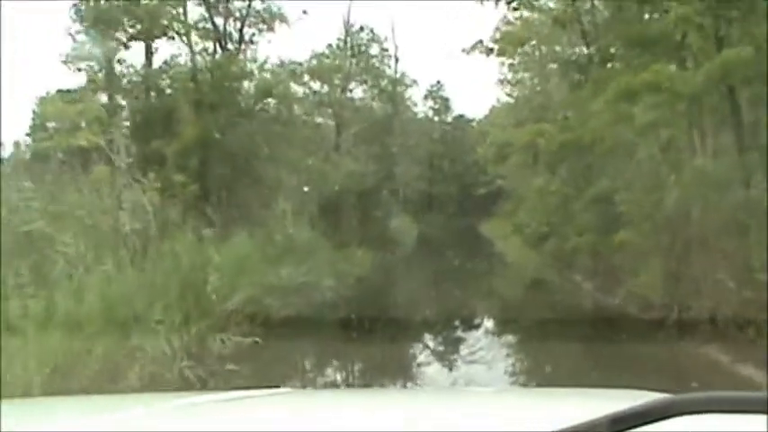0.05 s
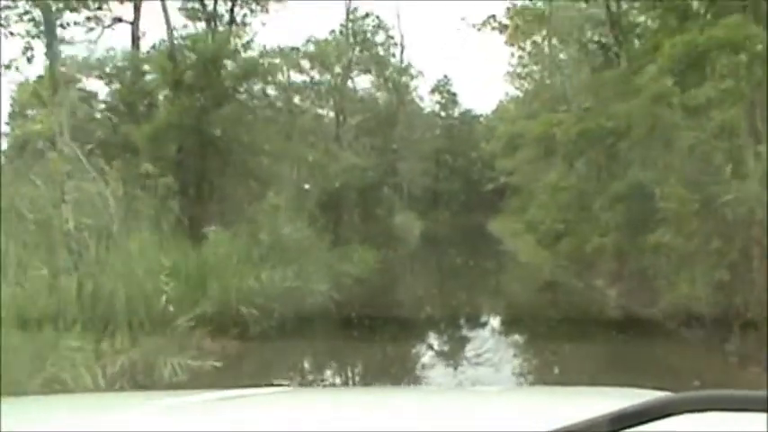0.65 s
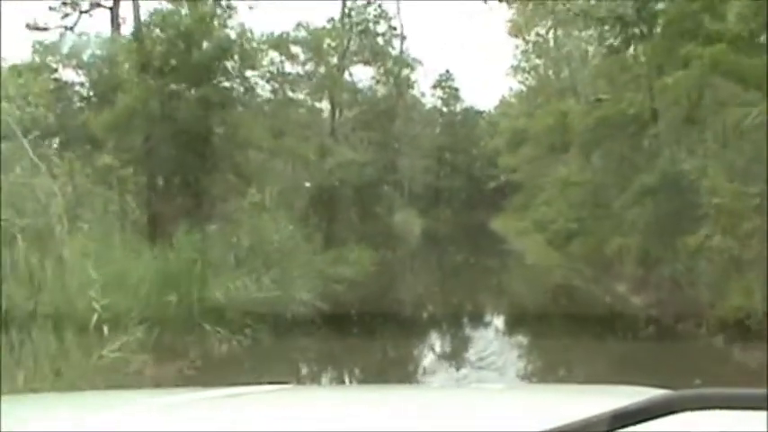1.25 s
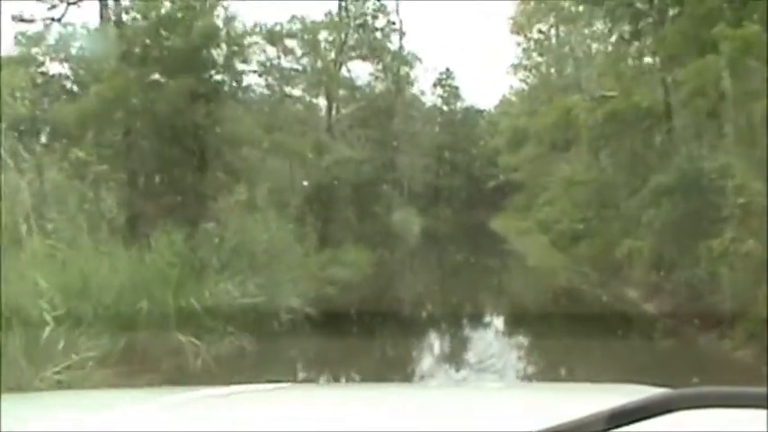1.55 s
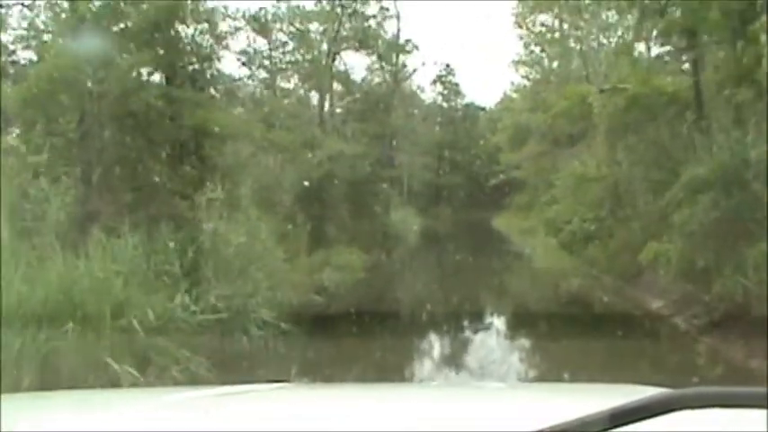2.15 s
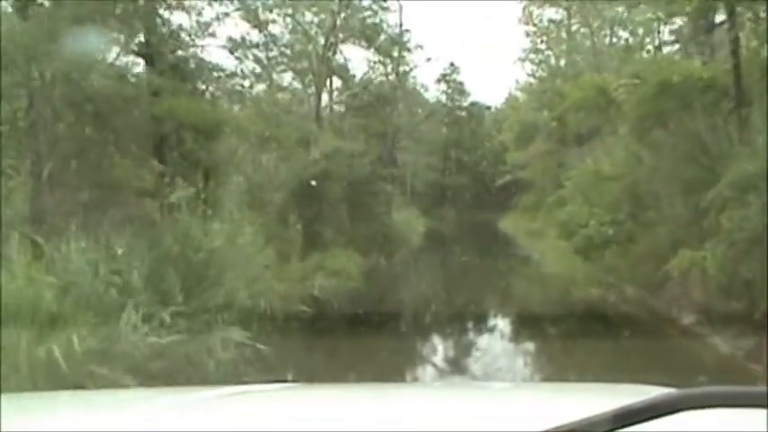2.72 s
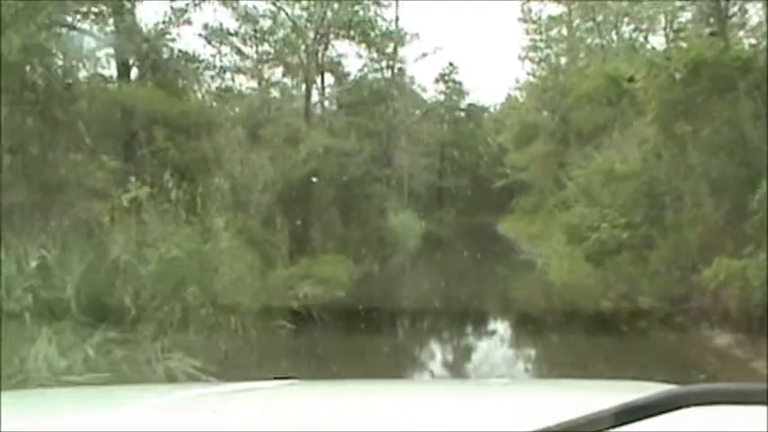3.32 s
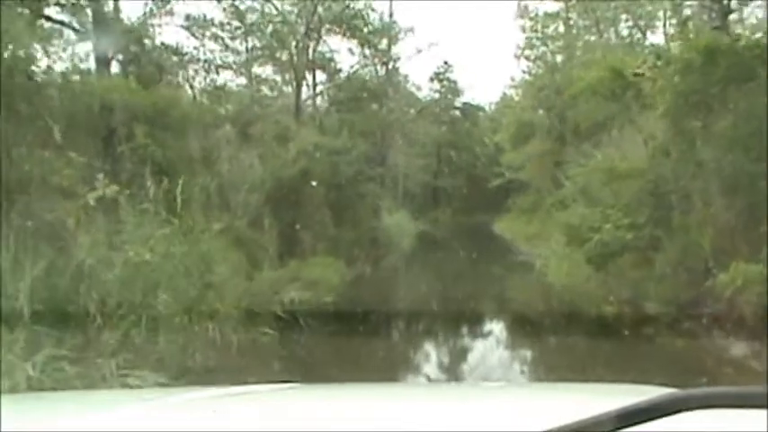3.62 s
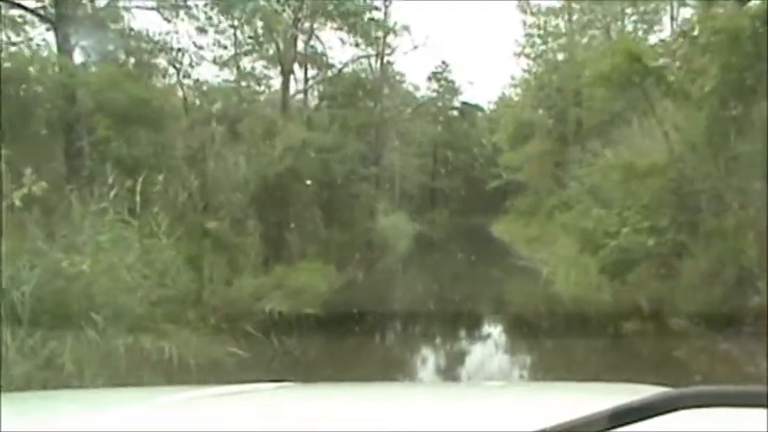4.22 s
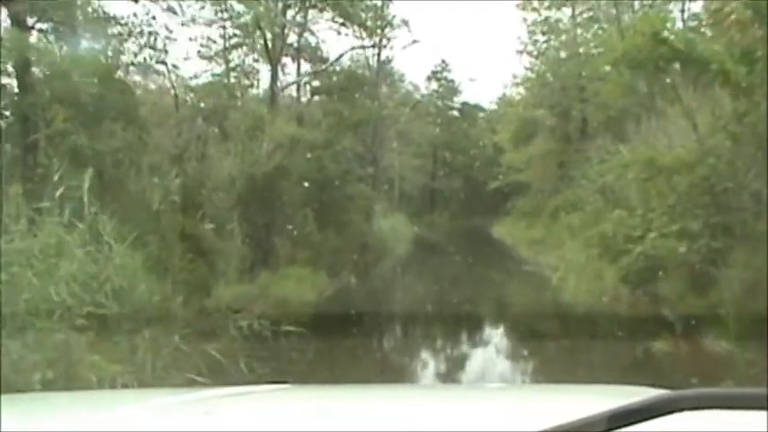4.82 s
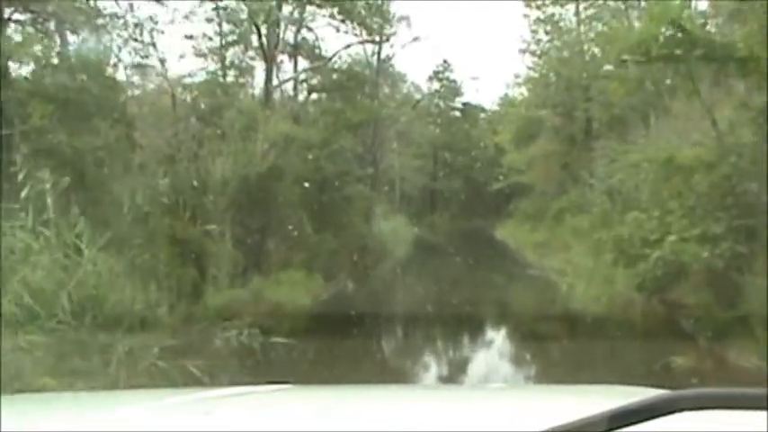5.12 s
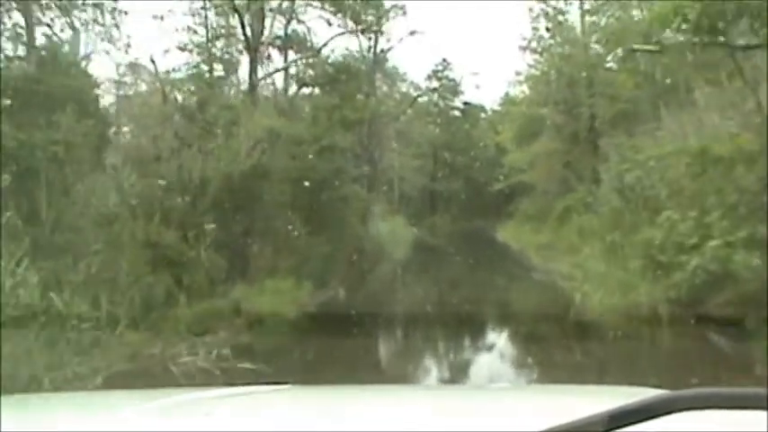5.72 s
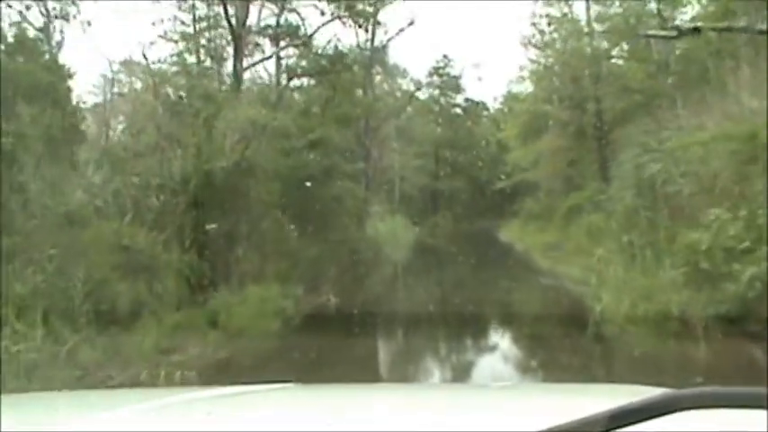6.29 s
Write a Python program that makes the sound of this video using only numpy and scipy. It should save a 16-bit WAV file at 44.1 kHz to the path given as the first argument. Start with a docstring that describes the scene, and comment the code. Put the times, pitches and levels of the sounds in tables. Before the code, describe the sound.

A deep, throbbing engine rumble fills the cab of a vehicle driving slowly through floodwater, with the microphone inside. The engine speed barely changes, and the exhaust bubbles under water. A softer rush of water and fine spray builds about a second in, with gurgles and slaps beneath the floor. The body knocks and loose trim clicks several times midway, over a rough panel buzz, and a few brief splashes follow near the end.

```python
"""A flooded trail, heard from the cab of an off-road vehicle wading at a steady crawl.
The six-cylinder engine drones; its exhaust burbles under water and makes the cab boom.
The bow wave washes along the body, and water slaps, gurgles and splashes around the floor pan.
The wet fan belt hisses, a panel buzzes, loose trim clicks and bumps jolt the body."""
import sys
import numpy as np
from scipy import signal
from scipy.fft import rfft, irfft
from scipy.io import wavfile
from scipy.ndimage import uniform_filter1d, minimum_filter1d

SR = 44100
rng = np.random.default_rng(int(sys.argv[2]) if len(sys.argv) > 2 else 0)


def transcribe(u):
    """Save the signal u as a 16-bit wav file named by the first command-line argument.

    u: samples, shape (n,) or (channels, n), limited to [-1, 1]; the rate is SR.
    q: integer samples, one column per channel.
    """
    v = np.clip(np.atleast_2d(u).T, -1, 1)
    q = np.round(v * 32767).astype(np.int16)
    wavfile.write(sys.argv[1], SR, q)


N = 280035
TIME = np.arange(N) / SR
BINS = np.maximum(np.arange(N // 2 + 1) * SR / N, 1)   # Hz


def from_db(db):
    """Decibels to gain."""
    return 10 ** (np.asarray(db) / 20)


def rms_one(x):
    """Scale to unit power."""
    return x / np.sqrt(np.mean(x ** 2) + 1e-20)


def at_level(pair, db):
    """Normalise the middle of a stereo pair, then ride its fader."""
    return pair / np.std(pair.mean(axis=0)) * from_db(db)


def in_time(rows):
    """A (time, value) curve, sample by sample."""
    return np.interp(TIME, *np.transpose(rows))


def in_frequency(rows):
    """Each column of a spectrum, bin by bin."""
    hz, *columns = np.transpose(rows)
    return [np.interp(np.log(BINS), np.log(hz), c) for c in columns]


def swell(s, length_s):
    """A smooth bump of height 1 around a moment."""
    return np.exp(-2 * ((TIME - s) / length_s) ** 2)


def since(s):
    """The samples of the second after a moment, and their age."""
    part = slice(int(s * SR), int(s * SR) + SR)
    return part, TIME[part] - TIME[part][0]


def drift(rate):
    """Random modulation of spread 1 that changes about `rate` times a second."""
    return rms_one(irfft(rfft(rng.standard_normal(N)) / (1 + (BINS / rate) ** 2), N))


def wavering_tone(hz, width_hz):
    """A tone of unit power whose strength and phase wander."""
    phase = 2 * np.pi * np.cumsum(hz * np.ones(N)) / SR
    return rms_one(drift(width_hz) * np.cos(phase) + drift(width_hz) * np.sin(phase))


def resonance(hz, width_hz):
    """Gain of one damped mode, 1 on top."""
    return abs(1 / (1 + 1j * (BINS ** 2 - hz ** 2) / (BINS * width_hz)))


def mode_bank(modes, widen=1):
    """Gain of steep-sided resonances whose powers add."""
    return np.sqrt(sum(from_db(2 * db) * resonance(hz, width * widen) ** 4 for hz, width, db in modes))


def colour(spectrum):
    """An EQ curve that falls away steeply beyond its ends."""
    skirts = 1 / (1 + (spectrum[0][0] / BINS / 2) ** 4) / (1 + (BINS / spectrum[-1][0] / 2) ** 4)
    return from_db(in_frequency(spectrum)[0]) * skirts


def stereo(direct, diffuse=np.zeros(N), eq=1):
    """Two close microphones: direct sound reaches both phase-shifted, reflections differ at each."""
    # stereo image: (frequency [Hz], likeness [0-1], left lead [rad], left minus right [dB])
    image = [(20, .997, -.4, .2), (55, .997, -.88, 0), (120, .985, -1.3, -1.5), (220, .88, -1.35, -2),
             (380, .93, -1.3, .5), (660, .64, -1.1, 3.2), (1000, .58, -.68, .3), (2000, .58, -.42, -.3),
             (4000, .77, 0, 1.1), (7000, .72, .15, 1.7), (13000, .5, 0, 1.1)]
    alike, lead, balance_db = in_frequency(image)
    sides = np.array([[1], [-1]])
    pair = np.sqrt(1 + alike) * rfft(direct) + sides * np.sqrt(1 - alike) * rfft(diffuse)
    placement = np.exp(.5j * sides * lead) * from_db(sides * balance_db / 2)
    return irfft(pair * eq * placement / np.sqrt(2), N)


def bubbly_noise(per_s, band_hz, cycles, spread_db, bubbles_db):
    """Direct and diffuse water noise; in the direct part, random bubbles each ring a few cycles."""
    noise, pitches = rng.standard_normal((2, N)), 16
    strength = from_db(spread_db * np.minimum(rng.exponential(1, N), 4)) * rng.choice([-1, 1], N)
    bursts = strength * (rng.random(N) < per_s / SR)
    pitch_index = rng.integers(0, pitches, N)
    rings = np.zeros(N)
    for k, hz in enumerate(np.geomspace(*band_hz, pitches)):
        decay, step = from_db(-60 * hz / (cycles * SR)), 2 * np.pi * hz / SR
        resonator = [1 - decay, 0, decay - 1], [1, -2 * decay * np.cos(step), decay ** 2]
        rings += signal.lfilter(*resonator, bursts * (pitch_index == k) + 1e-18)
    noise[0] += from_db(bubbles_db) * rms_one(rings)
    return noise


def crank_turns(firing_hz):
    """Turns of the crankshaft so far: three firings make one."""
    return np.cumsum(firing_hz) / SR / 3


def gulping():
    """Swell and lull of the gas flow at the drowned tailpipe, in dB."""
    # big gulps of exhaust: (time [s], boost [dB])
    gulps = [(.13, 6), (.22, 3), (.32, 5), (.54, 4), (.83, 2.5), (1.16, 5), (1.6, 7), (2.08, 3),
             (2.45, 5.5), (2.94, -0.5), (3.04, -1), (3.37, 3), (3.48, 4), (3.92, 3), (4.32, 2), (4.47, 4),
             (5.18, 0), (5.37, 2.5), (6.11, 4)]
    # water closes the tailpipe: (time [s], dip [dB], length [s])
    lulls = [(0.012, 7, 0.033), (0.474, 7, 0.056), (.61, 7, 0.056), (0.776, 6, .035), (1.68, 6, 0.042),
             (2.186, 19, 0.037), (2.27, 6, .06), (2.734, 6, 0.096), (3.216, 7, 0.048), (3.54, 6, 0.043),
             (3.702, 3.5, 0.2), (4.533, 18, 0.043), (4.997, 6, .035), (5.78, 5.5, 0.1), (6.036, 1, .03),
             (6.203, 4, 0.027)]
    gulps_db = sum(db * swell(s, length_s=.035) for s, db in gulps)
    return gulps_db - sum(db * swell(s, length_s) for s, db, length_s in lulls)


def engine(firing_hz):
    """The firings drone; uneven cylinders add a throb beneath, choked along with the exhaust."""
    # engine orders: (multiple of the crank rate [x], relative level [dB], unsteadiness [dB])
    orders = [(.5, -9, -3), (1, -0.5, 7), (1.5, -3, 2.5), (2, -4.5, 3.5), (2.5, -10.5, 7.5), (3, -2, 1.5),
              (10, -21.5, 2)]
    # engine load: (time [s], gain [dB])
    load = [(0, -26), (.5, -18), (.85, -18.5), (1.03, -20.5), (1.45, -18.5), (1.68, -17.5), (1.93, -26.5),
            (2.25, -17.5), (2.5, -22.5), (2.87, -16.5), (3.3, -23.5), (3.7, -18), (3.95, -23), (4.4, -17.5),
            (4.9, -26), (5.15, -20), (6.35, -21)]
    turns, drone = crank_turns(firing_hz), np.zeros(N)
    choke = from_db(.5 * gulping())
    for multiple, db, unsteady_db in orders:
        phase = 2 * np.pi * (multiple * turns + rng.random()) + .075 * unsteady_db * drift(22)
        flutter = rms_one(from_db(unsteady_db * drift(10)))
        partial = from_db(db) * flutter * np.sqrt(2) * np.sin(phase)
        drone += partial * (choke if multiple < 3 else 1)
    return stereo(drone) * from_db(in_time(load))


def gas_pocket():
    """Gas trapped at the tailpipe throbs, lower as the pocket grows, and makes the body shudder."""
    # throb of the pocket: (time [s], pitch [Hz])
    pitch = [(0, 43), (1.7, 42), (2.6, 37), (4, 34), (6.35, 33)]
    throb = wavering_tone(in_time(pitch), width_hz=8.2)
    shudder = wavering_tone(20.8, width_hz=7.4)
    return throb + from_db(-12) * shudder


def exhaust():
    """Gas breaks out of the drowned tailpipe, throbs under water and shakes the air in the cab."""
    # air modes of the cab: (frequency [Hz], base width [Hz], level [dB])
    cab_modes = [(56.9, 9.5, 1.5), (40.9, 13, -3.5), (89.8, 24, -11)]
    pops_per_s, even_s, evenness, fade_db_per_s = 300, .047, .86, .27
    pops = (rng.random((2, N)) < pops_per_s / SR) * rng.standard_normal((2, N))
    air = rms_one(stereo(*pops, eq=mode_bank(cab_modes, widen=1.95)))
    boom = rms_one(air + from_db(-2.5) * rms_one(stereo(gas_pocket())))
    # the steady gas flow evens out the boom
    power = abs(signal.hilbert(boom.mean(axis=0))) ** 2
    envelope = np.sqrt(uniform_filter1d(power, size=int(even_s * SR)) + .055)
    flow_db = -11 - fade_db_per_s * TIME + 1.7 * drift(3.3) + gulping()
    return at_level(boom / envelope ** evenness, flow_db)


def hull():
    """Churned water rumbles and slaps on the floor pan and sets the body panels droning."""
    # tone of the floor pan: (frequency [Hz], level [dB])
    floor_eq = [(75, 6), (140, -0.5), (165, -1), (205, 1), (255, -3), (330, -18)]
    # waves slap the floor pan: (time [s], boost [dB])
    slaps = [(.19, 3.5), (.4, 5.5), (.92, 4.5), (2.36, 8.5), (2.84, 4.5), (3.0, 2), (3.33, 2), (3.44, 3.5),
             (3.94, 6), (5.16, 6.5)]
    # body panels: (frequency [Hz], base width [Hz], level [dB])
    panel_modes = [(290, 40, 0), (336, 46, -1.5), (413, 31, -6), (444, 23, -5), (483, 95, -6.5)]
    # drone of the panels: (time [s], level [dB])
    drone_fader = [(0, -29.5), (.6, -31.5), (2.1, -29.5), (4, -29), (5, -28), (6.35, -29)]
    fade_db_per_s, panel_share = .28, .12
    slaps_db = sum(db * swell(s, length_s=.071) for s, db in slaps)
    rumble = stereo(*rng.standard_normal((2, N)), eq=colour(floor_eq))
    drone = stereo(*rng.standard_normal((2, N)), eq=mode_bank(panel_modes, widen=1.63))
    return (at_level(rumble, -24 - fade_db_per_s * TIME + slaps_db)
            + at_level(drone, in_time(drone_fader) + panel_share * slaps_db))


def slosh():
    """Bubbly water slops about under the body."""
    # tone of the slosh: (frequency [Hz], level [dB])
    slosh_eq = [(400, -16.5), (570, 6.5), (650, -1), (725, 4.5), (830, 0.5), (1000, -3.5), (1300, -24.5)]
    # water under the body: (time [s], level [dB])
    fader = [(0, -33), (.6, -34.5), (.9, -32.5), (1.9, -30.5), (3.3, -32.5), (4.7, -33), (6.35, -31.5)]
    churn = bubbly_noise(per_s=400, band_hz=(477.5, 1145), cycles=27, spread_db=-3, bubbles_db=-13.5)
    return at_level(stereo(*churn, eq=colour(slosh_eq)), in_time(fader))


def bow_wave(surge):
    """A surging rush full of bubbles; when the wave runs high it makes the wheel wells ring."""
    # the wave falls back, breaks and settles: (time [s], level [dB])
    fader = [(0.0, -38.5), (0.2, -37.5), (0.62, -40), (0.82, -34.5), (1.2, -33.5), (1.5, -34), (2.4, -36),
             (3.2, -34), (3.7, -35.5), (4.05, -33.5), (5.3, -34.5), (5.9, -33), (6.35, -35)]
    # crests break on the body: (time [s], boost [dB])
    crests = [(.825, 4), (.975, 2.5), (1.13, 3.5), (2.65, 3), (3.32, 1.5), (3.55, 3.5), (3.98, 3), (5.1, 0)]
    # tone of the wash: (frequency [Hz], level [dB])
    wash_eq = [(650, -3), (1050, 5.5), (1450, -0.5), (2000, -2.5), (2550, -4.5), (3200, -7), (4000, -13.5),
               (6000, -8.5), (12000, -36)]
    # hollow ring of the wheel wells: (frequency [Hz], width [Hz], level [dB])
    well_modes = [(1330, 175, 0), (1570, 170, -9), (1739, 107, 2.5), (2490, 120, -6.5), (3170, 100, -11)]
    settled_db, well_db_per_wave_db = -32.5, 2.9
    wave_db = in_time(fader)
    wells_db = -36.5 + well_db_per_wave_db * (wave_db - settled_db)
    crests_db = sum(db * swell(s, length_s=.031) for s, db in crests)
    rush = bubbly_noise(per_s=2000, band_hz=(983, 3660), cycles=15, spread_db=2.5, bubbles_db=-8.5)
    wash = stereo(*(rush * from_db(1.18 * surge)), eq=colour(wash_eq))
    wells = stereo(*rng.standard_normal((2, N)), eq=mode_bank(well_modes))
    return at_level(wash, wave_db + crests_db) + at_level(wells, wells_db + crests_db)


def spray(surge):
    """The wheels throw fine spray that fizzes up on each surge."""
    # tone of the spray: (frequency [Hz], level [dB])
    spray_eq = [(1500, 4.5), (3500, 2.5), (5000, 2.5), (7000, 0.5), (8500, 0.5), (10500, -2), (12000, -4.5),
                (15500, -9)]
    # spray thrown: (time [s], level [dB])
    fader = [(0, -39), (.6, -40), (1, -37.5), (1.5, -39), (2.45, -37.5), (3.7, -38), (4.3, -36.5),
             (6.35, -35.5)]
    fizz = bubbly_noise(per_s=3000, band_hz=(3100, SR / 3), cycles=8.7, spread_db=-1, bubbles_db=-9)
    fizz *= from_db(.88 * surge)
    return at_level(stereo(*fizz, eq=colour(spray_eq)), in_time(fader))


def fan_belt(firing_hz):
    """The wet belt hisses on its pulleys, a thin squeak inside the hiss, swelling once a lap."""
    # belt hiss: (time [s], level [dB])
    fader = [(0, -42.5), (.65, -45), (1.15, -50), (1.4, -49), (2, -54), (3, -56), (5, -54), (6.35, -47)]
    laps_per_turn, swell_db = .293, 4
    lap = np.cos(2 * np.pi * laps_per_turn * crank_turns(firing_hz) + .4 * drift(3))
    slip = rng.standard_normal((2, N)) * from_db(swell_db * lap)
    hiss = resonance(6140, width_hz=580) ** 2
    squeak = from_db(-6) * resonance(6050, width_hz=80)
    return at_level(stereo(*slip, eq=np.hypot(hiss, squeak)), in_time(fader))


def panel_buzz():
    """One panel buzzes roughly around its own pitch."""
    # buzz of the panel: (time [s], level [dB])
    fader = [(0, -29), (.6, -35), (1.1, -34.5), (2.45, -37), (2.66, -28.5), (2.76, -47), (3.02, -25),
             (3.15, -30), (3.65, -32), (3.82, -30), (3.95, -27), (4.52, -30), (4.65, -37), (4.79, -31),
             (5.2, -32), (6.1, -31), (6.35, -28)]
    direct, diffuse = (wavering_tone(387.4, width_hz=40) for _ in range(2))
    return at_level(stereo(direct, diffuse), in_time(fader))


def splashes():
    """Sheets of water hit the body and scatter into drops."""
    # splashes: (time [s], level [dB], 60 dB decay [s], brightest frequency [Hz])
    hits = [(.165, -33, .2, 2300), (.955, -25.5, 0.12, 1900), (1.06, -39, 1.0, 2900),
            (5.085, -33, .16, 1800), (5.553, -26.5, .11, 2800), (5.875, -29, 0.15, 1400)]
    drops = bubbly_noise(per_s=1200, band_hz=(1140, 5900), cycles=15, spread_db=5, bubbles_db=-1)
    out, attack_s = np.zeros((2, N)), .0055
    for s, db, t60, hz in hits:
        part, age = since(s)
        spatter = rms_one(signal.lfilter(*signal.iirpeak(hz, Q=1.9, fs=SR), drops[:, part]))
        out[:, part] += spatter * from_db(db - 60 * age / t60) * (1 - np.exp(-age / attack_s))
    return stereo(*out)


def loose_trim():
    """Loose trim chatters: each click is a bright crack with a brief clink."""
    # clicks: (time [s], crack gain [dB], 60 dB decay [s], crack centre [Hz], sharpness [Q],
    # clink pitch [Hz], clink gain [dB])
    clicks = [(.262, -30, .11, 5500, 1.4, 2400, -37), (.328, -37, 0.064, 2600, 2.5, 2300, -22),
              (1.259, -31, .05, 7100, 1.2, 3320, -22), (2.3356, -31, .046, 4500, 1.6, 3700, -31),
              (2.5246, -12.5, 0.031, 8750, 1.4, 2380, -11.5), (2.5613, -22, .03, 7500, 2, 7300, -25),
              (3.2547, -24, 0.064, 5430, 1.8, 5200, -16), (3.559, -26, .079, 5500, 3.2, 2420, -20),
              (3.568, -25, .044, 6000, 2.7, 2980, -16), (5.559, -35, .08, 3000, 1.6, 2740, -22),
              (5.6077, -32, 0.1, 7000, 1.4, 2750, -31)]
    # resonances of the trim: (frequency [Hz], width [Hz], boost [dB])
    trim_modes = [(2330, 1000, 4.5), (3900, 780, 10), (7500, 3000, 3), (10100, 1200, 2.5)]
    out, grain = np.zeros((2, N)), rng.standard_normal((2, N))
    for s, crack_db, t60, crack_hz, q, clink_hz, clink_db in clicks:
        part, age = since(s)
        chatter = grain[:, part] * from_db(-60 * age / t60)
        crack = signal.lfilter(*signal.iirpeak(crack_hz, Q=q, fs=SR), chatter)
        clink = signal.lfilter(*signal.iirpeak(clink_hz, Q=9, fs=SR), chatter)
        out[:, part] += from_db(crack_db) * crack + from_db(clink_db) * clink
    boost_db = sum(db * resonance(hz, width) ** 2 for hz, width, db in trim_modes)
    return stereo(*out, eq=from_db(boost_db))


def gurgles():
    """Big bubbles under the body ring briefly and rise in pitch as they surface."""
    # big bubbles: (time [s], starting pitch [Hz], level [dB])
    big_bubbles = [(.805, 644, -21), (1.125, 935, -28), (1.555, 780, -21), (1.725, 740, -26),
                   (1.865, 590, -18), (1.98, 786, -23), (2.276, 538, -21), (2.765, 750, -20),
                   (3.905, 734, -21), (4.375, 800, -18)]
    ring_cycles, rise_per_s, attack_s = 95, 1, .0038   # the rise is a share of the pitch
    out = np.zeros(N)
    for s, hz, db in big_bubbles:
        part, age = since(s)
        envelope = from_db(db - 60 * age * hz / ring_cycles) * (1 - np.exp(-age / attack_s))
        out[part] += envelope * np.sin(2 * np.pi * hz * age * (1 + rise_per_s * age / 2))
    return stereo(out)


def whine(firing_hz):
    """A faint whine comes and goes, its pitch tracking the engine."""
    # swells of the whine: (time [s], level [dB])
    swells = [(1.05, -42), (3.11, -42), (4.0, -38), (4.3, -42), (5.1, -39), (6.14, -43)]
    envelope = sum(from_db(db) * swell(s, length_s=.084) for s, db in swells)
    return stereo(wavering_tone(14.35 * firing_hz, width_hz=30) * envelope)


def knocks():
    """Bumps jolt the body; the harder the contact, the more the upper modes ring."""
    # bumps: (time [s], level [dB], contact brightness [Hz])
    bumps = [(1.395, -12.5, 300), (2.318, -12, 260), (2.527, -16, 500), (2.547, -12.5, 700),
             (2.794, -11.5, 400), (3.256, -19, 700), (3.271, -11, 1000), (3.488, -17, 350),
             (5.687, -14, 300)]
    # ring of the jolted body: (frequency [Hz], relative level [dB], 60 dB decay [s])
    body_modes = [(161, -4, 0.11), (193.5, 1, 0.088), (289, -1.5, .13), (382, -4, 0.09), (512, -4, .07),
                  (800, 1, .05)]
    out, detune, attack_s = np.zeros(N), .057, .0032
    for s, db, contact_hz in bumps:
        part, age = since(s)
        attack = 1 - np.exp(-age / attack_s)
        for k, (hz, mode_db, t60) in enumerate(body_modes):
            pitch_hz = hz * (1 + detune * rng.standard_normal())
            ring = np.sin(2 * np.pi * pitch_hz * age) * from_db(db + mode_db - 60 * age / t60)
            out[part] += (-1) ** k * ring * attack / np.hypot(1, hz / contact_hz)
    return stereo(out)


def cab(x):
    """Close reflections comb the sound; upholstery takes away some of their treble."""
    # reflections from roof, door and rear of the cab: (delay [ms], gain [x])
    reflections = [(5.81, .11), (4.4, .08), (8.9, .06), (13.7, .06), (21.3, .05)]
    echoes = sum(gain * np.exp(-2j * np.pi * BINS * ms / 1000) for ms, gain in reflections)
    return irfft(rfft(x) * (1 + echoes / np.hypot(1, BINS / 6000)), N)


def scene():
    """The mix as it reaches the dashboard."""
    # engine speed: (time [s], firing rate [Hz])
    speed = [(0.0, 122.0), (0.55, 124.6), (0.81, 122.0), (2.7, 121.6), (3.2, 120.1), (4.7, 120.7),
             (5.0, 118.6), (5.3, 120.7), (6.35, 120.2)]
    firing_hz = in_time(speed) + .408 * drift(1.56)   # the speed wanders a little under load
    body = hull() + slosh() + knocks() + loose_trim() + fan_belt(firing_hz)
    drone = engine(firing_hz) + exhaust() + panel_buzz() + whine(firing_hz)
    surge = drift(11.6)   # wash and spray share quick, uneven surges
    water = bow_wave(surge) + spray(surge) + gurgles() + splashes()
    return drone + cab(body + water)


def record(dry):
    """Cut the deepest bass, add a faint high whistle, duck the bass on peaks and cut the top."""
    low_cut_hz, duck_below_hz, high_cut_hz = 16, 160, 15900
    ceiling, span = .95, int(.012 * SR)
    whistle = from_db(-72) * np.sin(2 * np.pi * 15734 * TIME)
    heard = signal.sosfilt(signal.butter(3, low_cut_hz, "high", fs=SR, output="sos"), dry) + whistle
    bass = irfft(rfft(heard) / (1 + (BINS / duck_below_hz) ** 4), N)
    allowed = 1 / np.maximum(abs(heard).max(axis=0) / ceiling, 1)
    bass_gain = uniform_filter1d(minimum_filter1d(allowed, size=span), size=span)
    ducked = heard + bass * (bass_gain - 1)
    return signal.sosfilt(signal.ellip(10, .1, 80, high_cut_hz, fs=SR, output="sos"), ducked)


dry = scene()
out = record(dry)
transcribe(out)
```